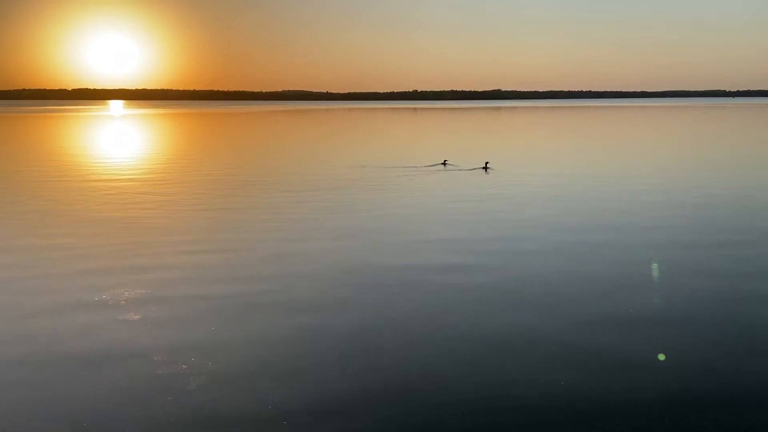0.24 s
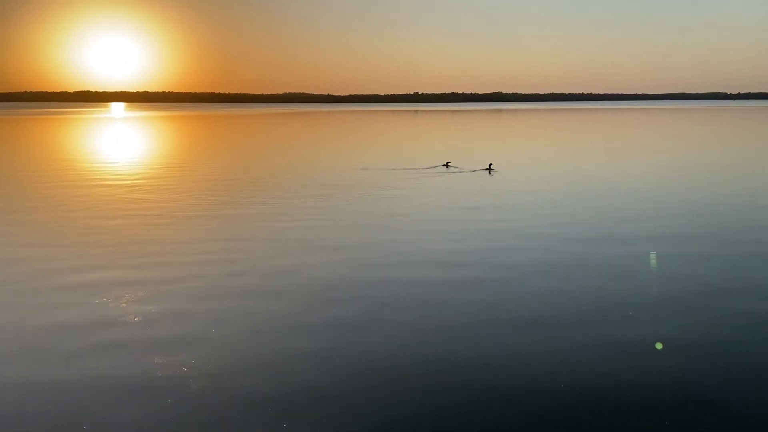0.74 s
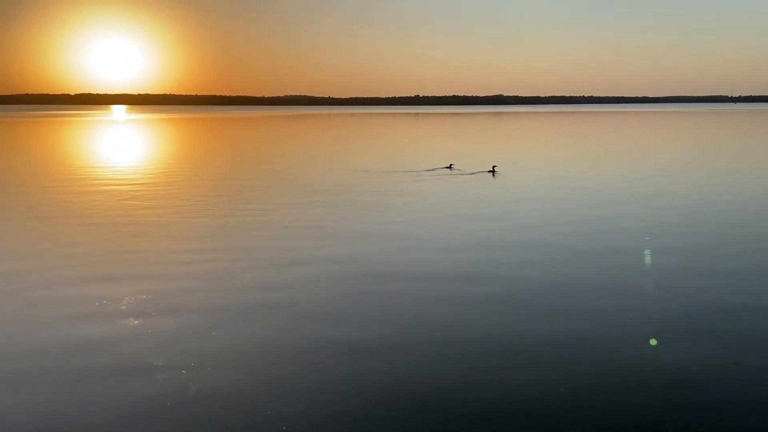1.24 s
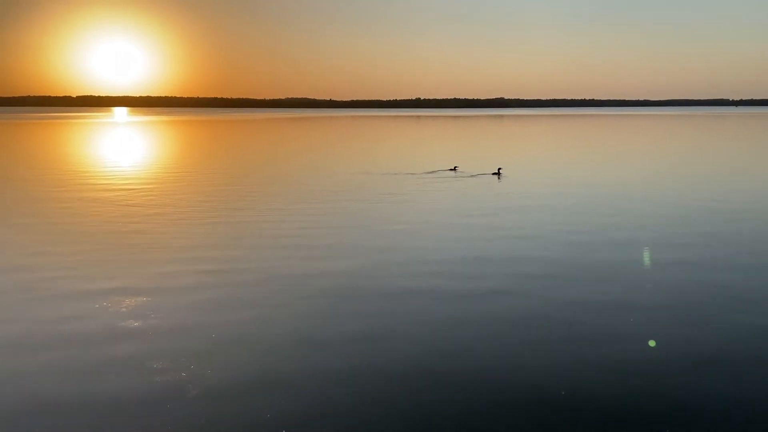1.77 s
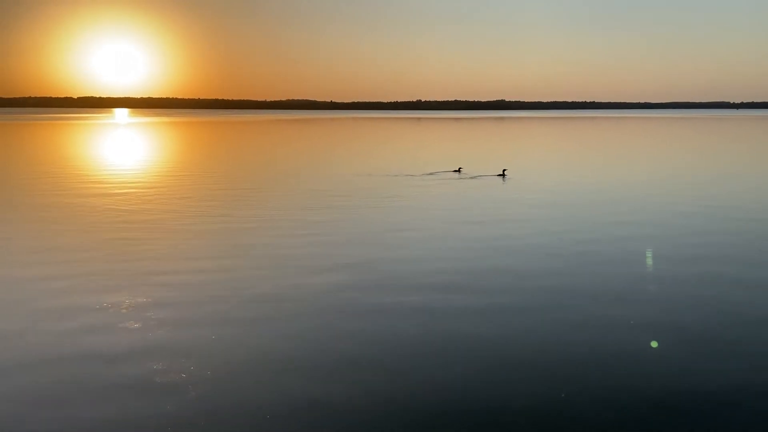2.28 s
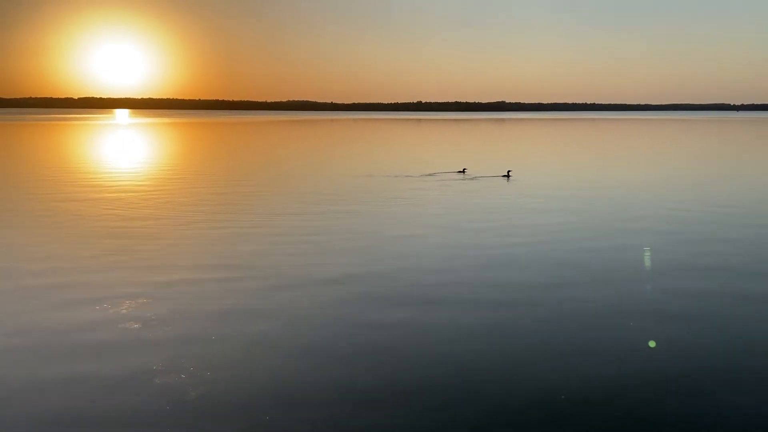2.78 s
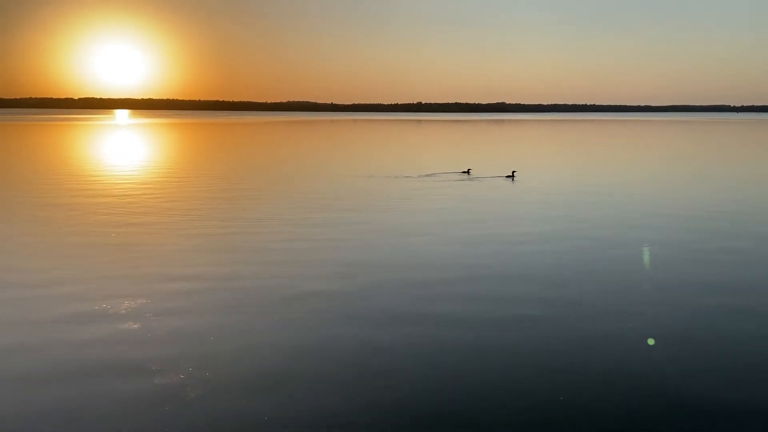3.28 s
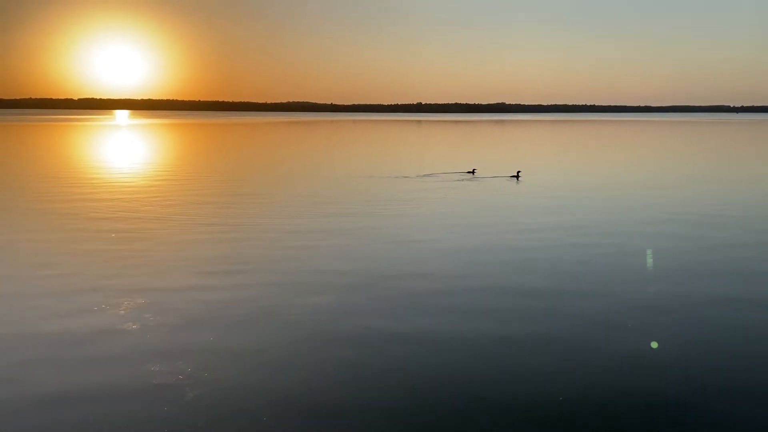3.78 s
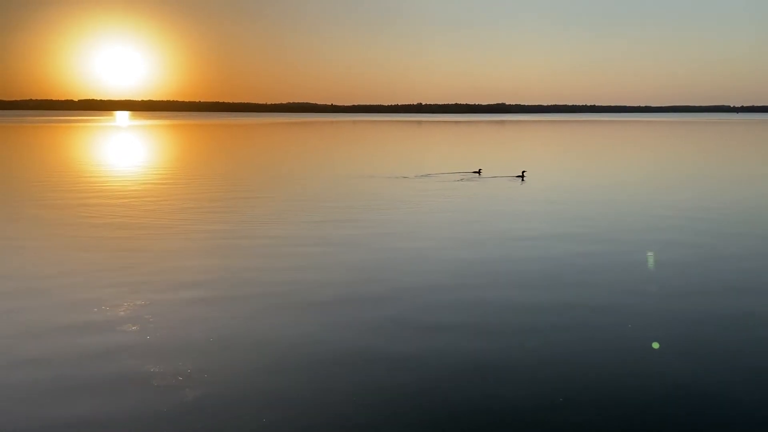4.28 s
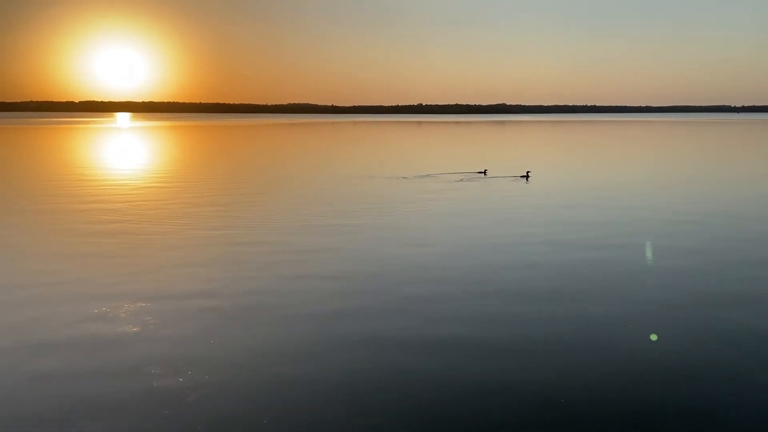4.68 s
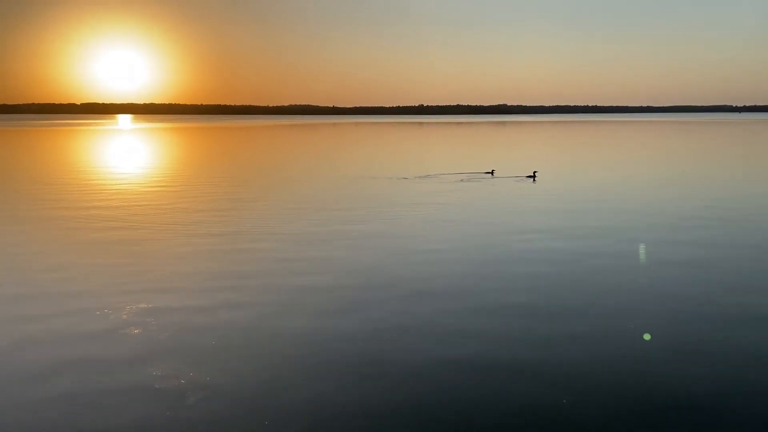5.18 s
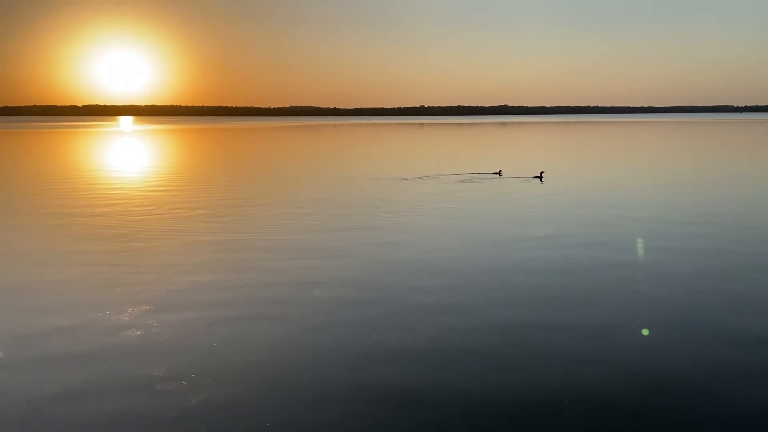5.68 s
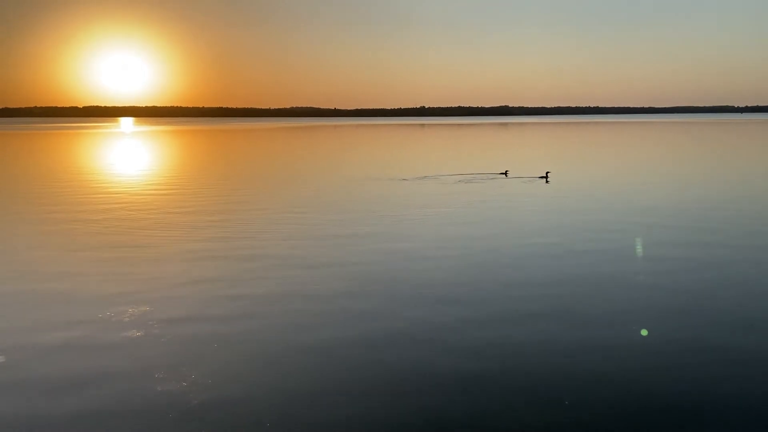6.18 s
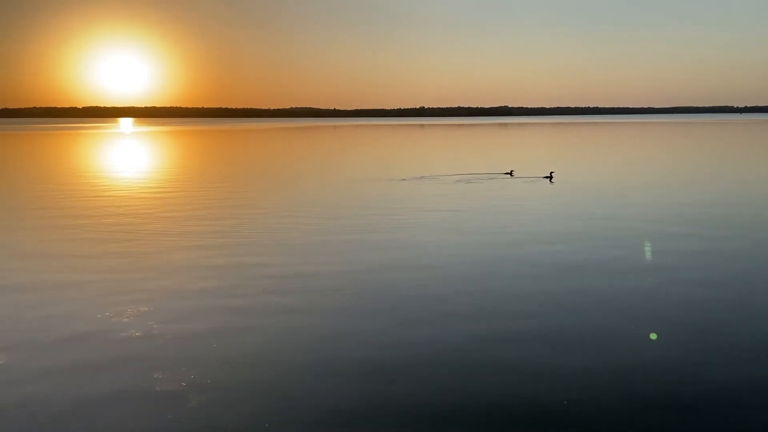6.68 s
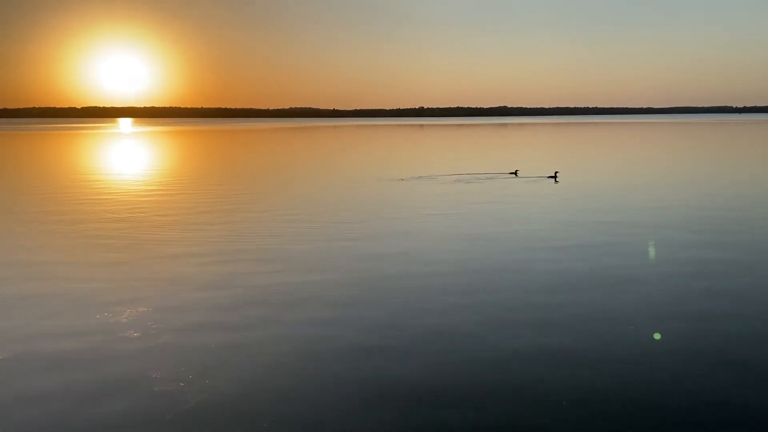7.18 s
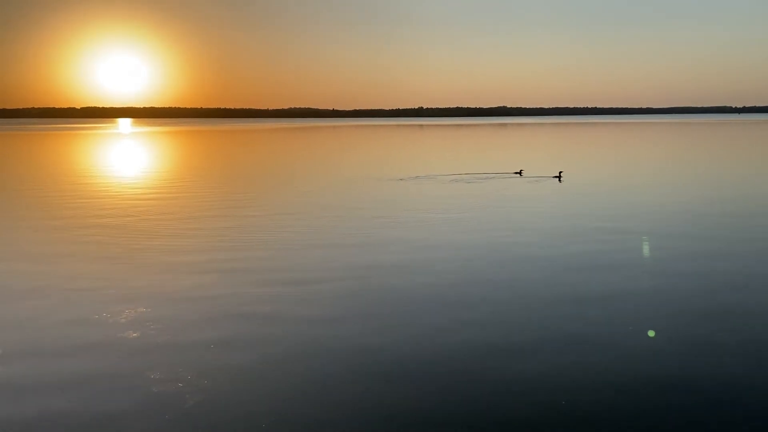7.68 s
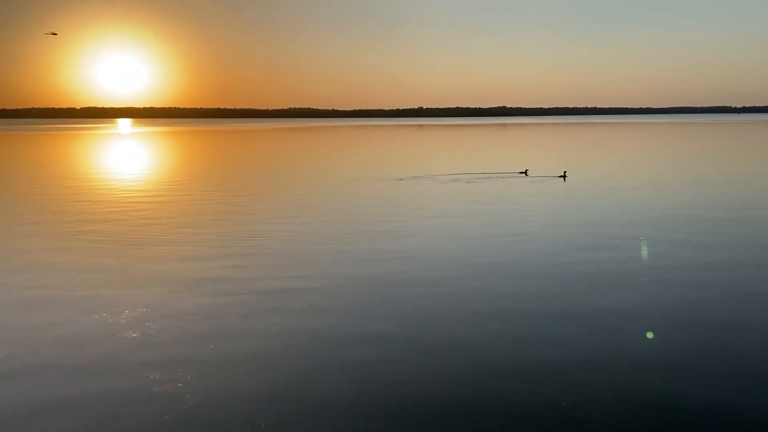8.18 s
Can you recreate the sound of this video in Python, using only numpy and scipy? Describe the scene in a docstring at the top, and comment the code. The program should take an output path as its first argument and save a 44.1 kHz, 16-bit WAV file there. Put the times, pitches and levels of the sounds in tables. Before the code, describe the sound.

On a quiet open lake, a loon utters five short tremolo calls, each a fast string of six or seven clear, arching hoots, spaced by about a second of stillness. Most calls break briefly into a higher register. Woods return a soft, long echo. Tiny bird twitters come early, a blurred far songbird later, and a soft hoarse hoot follows the fourth call. Low rumble and hum lie beneath; stereo microphones hear the loon slightly right.

```python
"""A loon gives five tremolo calls on a calm lake, to the right of a pair of microphones; the woods echo them.
Its two-register voice arches in pitch about eleven times a second; in four calls it breaks into the higher
register for a while and drops back. A rough catch precedes each call; a second loon's soft hoarse hoot follows
the fourth. Behind lie faint whistled twitters, a far songbird blurred by the woods, one tiny click, and shaped
noise: a low rumble, with a wavering hum, whose level dips before most calls and jumps as they begin, and a
faint hiss."""
import sys
import numpy as np
from scipy import signal
from scipy.fft import rfft, irfft, next_fast_len
from scipy.io import wavfile

SR = 44100
rng = np.random.default_rng(int(sys.argv[2]) if len(sys.argv) > 2 else 0)


def wav_out(sig):
    """Save sig, one row per channel (or a flat mono array), as 16-bit PCM at SR to the path in sys.argv[1]."""
    wavfile.write(sys.argv[1], SR, np.round(np.clip(np.atleast_2d(sig).T, -1, 1) * 32767).astype(np.int16))


N = 372204
EDGE_HZ = 14600  # upper edge of the recorded band


def gain_of(db):
    """Decibels to amplitude."""
    return 10 ** (np.asarray(db) / 20)


def evened(x):
    """Scales to rms 1."""
    return x / np.sqrt(np.mean(x ** 2) + 1e-20)


def read(points, hz):
    """Reads a table over log frequency."""
    table = np.array(points, float)
    return np.interp(np.log(hz + 1), np.log(table[:, 0] + 1), table[:, 1])


def add(mix, s, sound):
    """Mixes a sound in at time s."""
    part = mix[max(round(s * SR), 0):][:len(sound)]
    part += sound[:len(part)]


def shaped(x, response):
    """Filters by a response given as a function of Hz."""
    size = next_fast_len(x.shape[-1] + 512)
    spectrum = rfft(x, size) * response(np.fft.rfftfreq(size, 1 / SR))
    return irfft(spectrum, size)[..., :x.shape[-1]]


def wobble(n, hz):
    """Smooth chance of rms 1 that moves up to about hz times a second."""
    knots = np.convolve(rng.standard_normal(2048), np.hanning(7), "same")
    place = np.arange(n) * (4 * hz / SR) % 2040
    return evened(np.interp(place, np.arange(2048), knots))


def band_noise(n, centre_hz, octaves):
    """Noise in a bell-shaped band."""
    def bell(f):
        return np.exp(-(np.log2((f + 1) / centre_hz) / octaves) ** 2)
    return evened(shaped(rng.standard_normal(n), bell))


# spectrum of the still air over the lake: (frequency [Hz], relative density [dB per Hz])
AIR_SPECTRUM = [(20, -34.5), (40, -15), (62, -2.5), (90, -2), (120, -6), (160, -10.5), (250, -15),
                (420, -22.5), (630, -30), (1000, -40.5), (2000, -40), (4000, -41), (8000, -48),
                (13000, -65.5)]
# likeness of the air at the two microphones: (frequency [Hz], correlation [-1 to 1])
AIR_LIKENESS = [(60, 0.95), (100, 0.9), (180, 0.74), (300, 0.054), (520, 0.71), (900, 0.72), (1500, 0.43),
                (2600, -0.55)]
# level of the low rumble, dipping before most calls, used relative to its mean: (time [s], level [dB])
RUMBLE_LEVEL = [(0.05, -69), (0.19, -60.5), (1.34, -60.5), (1.83, -72.5), (1.94, -60), (2.48, -70),
                (2.64, -61), (3.46, -66.5), (3.58, -58.5), (4.42, -62.5), (4.6, -58.5), (5.73, -64),
                (5.8, -58.5), (6.34, -66), (6.9, -64.5), (7.08, -71), (7.15, -60), (8.44, -61.5)]
AIR_DB, HUM_DB, HUM_HZ = -63, -70, 106.3  # levels before the dips and jumps


def background(hum_waver=.015, hum_swell_db=3, hiss_share=0.16, lumps_db=0.5):
    """Low rumble and hum whose level dips before most calls and jumps as they begin, and a very faint hiss."""
    t = np.arange(N) / SR
    level_db = np.interp(t, *np.transpose(RUMBLE_LEVEL)) - np.mean(np.array(RUMBLE_LEVEL)[:, 1])

    def share(f, sign):
        return gain_of(read(AIR_SPECTRUM, f)) * np.sqrt(np.clip(1 + sign * read(AIR_LIKENESS, f), 0, 2))
    noise_a, noise_b = rng.standard_normal((2, N))
    mid = shaped(noise_a, lambda f: share(f, 1))
    side = shaped(noise_b, lambda f: share(f, -1))
    air = gain_of(AIR_DB) * evened(np.array([mid + side, mid - side]))
    low = shaped(air, lambda f: 1 / (1 + (f / 500) ** 2))
    hiss = air - low
    hum_hz = HUM_HZ * (1 + hum_waver * wobble(N, 7.3))
    hum = np.sin(2 * np.pi * np.cumsum(hum_hz) / SR) * gain_of(hum_swell_db * wobble(N, 1.9))
    rumble = (low + gain_of(HUM_DB) * evened(hum)) * gain_of(level_db + lumps_db * wobble(N, 7.8))
    both = rumble + hiss * gain_of(hiss_share * level_db)  # the hiss follows only slightly
    return both * gain_of([[-.5], [.5]])  # a little louder on the right


def chirp(length, hz, warble, db, blur, warble_hz=21):
    """A thin whistle that swings in pitch, with a finer random blur of the pitch."""
    t = np.arange(int(length * SR)) / SR
    swing = warble * np.sin(2 * np.pi * warble_hz * t + np.pi / 4)
    pitch = hz * (1 + swing + blur * wobble(len(t), 560))
    whistle = np.sin(2 * np.pi * np.cumsum(pitch) / SR)
    return gain_of(db) * evened(whistle * signal.windows.tukey(len(t), .6))


# a far songbird's opening notes, before the woods blur them: (time [s], pitch [Hz], level [dB])
SONG_OPENING = [(5.05, 3870, -87), (5.17, 5420, -82.5), (5.27, 5700, -84), (5.472, 5210, -76),
                (5.58, 5100, -73)]
# the two notes its song ends by rocking between: (first time [s], pitch [Hz], first level [dB])
SONG_SEESAW = [(5.869, 4140, -79.5), (5.932, 3040, -74.5)]
SEESAW_BEAT_S, SEESAW_FADE_DB_PER_S = .141, -5


def song_notes(count=5):
    """The songbird's opening notes, then its fading see-saw."""
    beats = SEESAW_BEAT_S * np.arange(count)
    seesaw = [(s + late, hz, db + SEESAW_FADE_DB_PER_S * late)
              for s, hz, db in SONG_SEESAW for late in beats]
    return list(SONG_OPENING) + seesaw


# twitters over the water: (time [s], length [s], pitch [Hz], warble [share of the pitch], level [dB])
TWITTERS = [(0.647, 0.066, 5260, 0.082, -80.5), (0.783, 0.086, 5030, 0.047, -81),
            (1.209, 0.085, 4760, 0.066, -77.5), (1.374, 0.078, 4940, 0.058, -81)]


def small_birds(note_length=0.062, woods_t60=0.99, twitter_blur=0.043):
    """Twitters over the water, and a song that the far woods blur into a wash of decaying noise."""
    twitter, song = np.zeros((2, N))
    for s, *note in TWITTERS:
        add(twitter, s, chirp(*note, blur=twitter_blur))
    for s, hz, db in song_notes():
        add(song, s, chirp(note_length, hz, .015, db, blur=.04))
    tail = rng.standard_normal((2, SR)) * gain_of(-60 * np.arange(SR) / SR / woods_t60)
    wash = signal.fftconvolve(song[None], tail / np.linalg.norm(tail[0]), axes=1)[:, :N]
    return twitter + 0.56 * song + wash


def click():
    """One tiny sharp click, an instant rise and fast decay, as the fourth call begins."""
    out, t = np.zeros(N), np.arange(200) / SR
    add(out, 5.3957, gain_of(-39) * np.exp(-t / .0004))
    return out


# echoes from stretches of shore: (delay [s], smear [s], level [dB re the loon])
SHORE_ECHOES = [(.075, .015, -25.5), (0.189, 0.012, -28), (.232, .01, -37), (0.492, .01, -44)]
# ring of the woods: (frequency [Hz], time to fall 60 dB [s])
WOODS_RING = [(600, 2.3), (1200, 1.34), (1800, 1.3), (4000, 0.42), (10000, .3)]


def shore(x, tail_db=-26, build=0.034, opposed=.3, dull_hz=6000):
    """Distinct echoes from the shore and the long, uneven ring of its woods, from shaped noise."""
    hz, t, z = signal.stft(rng.standard_normal((2, 2 * SR)), SR, nperseg=256)
    z = z * gain_of(-60 * t / read(WOODS_RING, hz)[:, None]) * (1 - np.exp(-t / build))
    tail = signal.istft(z, SR, nperseg=256)[1]
    # stands of trees send the sound back in clumps
    tail *= gain_of(4 * np.tanh(wobble(tail.shape[1], 18)))
    # sound from the sides reaches the two microphones out of step
    tail = tail - opposed / 2 * tail[::-1]
    # the ring's level is set between 700 and 1800 Hz
    voice_band = rfft(tail, SR * 2)[:, 1400:3600]
    tail *= gain_of(tail_db) / np.sqrt(np.mean(abs(voice_band) ** 2))
    for delay, smear, db in SHORE_ECHOES:
        for channel in tail:
            burst = rng.standard_normal(SR // 10) * np.exp(-np.arange(SR // 10) / SR / smear)
            add(channel, delay, gain_of(db) * burst / np.linalg.norm(burst))
    dulled = shaped(x, lambda f: 1 / (1 + (f / dull_hz) ** 4))
    return signal.fftconvolve(dulled[None], tail, axes=1)[:, :N]


# level of the loon between the microphones: (frequency [Hz], left minus right [dB])
MICROPHONE_LEVEL = [(650, -1), (880, -7), (1100, -2), (1300, -2.5), (1750, -2), (2600, 0), (3900, 1.5),
                    (7000, -0.5)]
# phase of the loon between the microphones: (frequency [Hz], lead of the left [rad])
MICROPHONE_LEAD = [(850, -.38), (1200, -.85), (1750, -.8), (2600, -.3), (3900, -1.05), (11000, -1.7)]


def microphones(x):
    """The pair of microphones hears the loon slightly to the right, by level and phase."""
    def half(f):
        return gain_of(read(MICROPHONE_LEVEL, f) / 2) * np.exp(.5j * read(MICROPHONE_LEAD, f))
    return np.array([shaped(x, half), shaped(x, lambda f: 1 / half(f))])


def hoot(hz=710, tone_db=-52, rasp_db=-50, rasp_peak=0.049):
    """A soft short hoot with a weaker second pulse, ending in a hoarse rasp of noise."""
    t = np.arange(SR // 3) / SR
    phase = 2 * np.pi * hz * np.cumsum(1 + .012 * wobble(len(t), 80)) / SR
    pulses = np.exp(-((t - .017) / .01) ** 2) + .5 * np.exp(-((t - .063) / .02) ** 2)
    tone = (np.sin(phase) + 0.1 * np.sin(2 * phase) + 0.22 * np.sin(3 * phase)) * pulses
    rasp_swell = (t / rasp_peak) ** 2 / (1 + (t / rasp_peak) ** 4) * (1 - t / t[-1])
    rasp = band_noise(len(t), 1250, .95) * rasp_swell
    return np.sqrt(2) * gain_of(tone_db) * tone + gain_of(rasp_db) * rasp


def creak(db, start_hz=380, end_hz=500, length=.029):
    """The rough rising catch, an octave down, with which a call starts: harmonics through a resonance."""
    u = np.linspace(0, 1, int(length * SR))
    hz = (start_hz + (end_hz - start_hz) * u) * (1 + .025 * wobble(len(u), 400))
    phase = 2 * np.pi * np.cumsum(hz) / SR
    stack = sum(np.cos(k * phase + rng.uniform(0, 2 * np.pi)) / (1 + ((k * hz - 1250) / 330) ** 2)
                for k in range(1, 7))
    return gain_of(db) * evened(stack * u * signal.windows.tukey(len(u), .4))


# crests climb to the top pitch by the third note, then sink ever faster (shares of the top pitch)
CLIMB, SINK = .095, .0048
# the pitch dips between notes, deeper as the call goes on (shares of the pitch)
DIP_FIRST, DIP_PER_NOTE, DIP_MOST = .145, 0.028, .21
# the last note falls to a resting pitch and trails off from there
FALL_S, REST_HZ, TRAIL_HZ_PER_S = 0.054, 649.8, 450
# the beat drags toward the end: each earlier beat has this share of the next one's drag
# the first troughs come early (share of a beat)
DRAG_SHARE, LEAN = .44, .06


def melody(t, first_crest, notes, beat, drag, top_hz, last_hz):
    """Round arches on a slowing beat: times of the troughs, distance from a crest, and pitch."""
    k = np.arange(notes)
    crest_s = first_crest + np.cumsum((k > 0) * (beat + drag * DRAG_SHARE ** k[::-1]))
    climb = CLIMB * np.maximum(1 - k / 2, 0) ** 1.5
    sink = SINK * np.maximum(k - 2, 0) ** 2
    crest_hz = top_hz * (1 - climb - sink)
    dip = np.minimum(DIP_FIRST + DIP_PER_NOTE * k[:-1], DIP_MOST)
    trough_hz = (1 - dip) * (crest_hz[:-1] + crest_hz[1:]) / 2
    trough_hz = np.r_[trough_hz[0], trough_hz, REST_HZ]
    crest_hz[-1] = last_hz
    trough_s = crest_s[:-1] + np.diff(crest_s) * (.5 - LEAN * np.maximum(1 - k[:-1] / 2, 0))
    turns_s = np.sort(np.r_[first_crest - beat / 2, crest_s, trough_s, crest_s[-1] + FALL_S])
    place = np.interp(t, turns_s, np.arange(len(turns_s)) / 2 - .5)  # whole numbers on the crests
    note = np.clip(np.round(place), 0, notes - 1).astype(int)
    away = 2 * abs(place - note)  # 0 on a crest, 1 in a trough
    sag = 1 - abs(np.cos(np.pi / 2 * away)) ** 1.4
    hz = crest_hz[note] + (trough_hz[np.floor(place).astype(int) + 1] - crest_hz[note]) * sag
    return trough_s, away, hz - TRAIL_HZ_PER_S * np.maximum(t - crest_s[-1] - FALL_S, 0)


# both registers are louder at higher pitch; the fundamental starts softly
FULL_HZ, LOW_DB_PER_OCTAVE, HIGH_DB_PER_OCTAVE = 892, 28, 10.5
SOFT_START_DB, SOFT_START_S, ATTACK_S, RELEASE_S = -3.5, .06, .0035, .03
# weakening between notes
LOW_DIP_DB, OCTAVE_DIP_DB, HIGH_DIP_DB = -0.5, -5.5, -6
# the low register's octave passes a resonance of the throat
OCTAVE_HZ, OCTAVE_WIDTH_HZ = 1702, 203
# the high register cracks in briefly just after each trough, ever weaker, and chokes the low one
CRACK_S, CRACK_LATE_S, CRACK_DB, CRACK_DB_PER_NOTE, CRACK_CHOKE = 0.0039, 0.0017, -3.5, -0.9, .7
# the leap between registers; the low one lingers after it and stirs faintly in the troughs
SWITCH_S, LINGER_S, STIR_DB = .0025, 0.017, -17.5


def quaver(call):
    """One call's pitch, and the strength of the low register, of its octave and of the high register."""
    start, first_crest, end, notes, beat, drag, top_hz, last_hz, held, low_db, high_db = call
    t = np.arange(start, end, 1 / SR)
    trough_s, away, hz = melody(t, first_crest, round(notes), beat, drag, top_hz, last_hz)
    since_leap = t - trough_s[2]  # the voice leaps after the third note
    leap = np.tanh(since_leap / SWITCH_S + 1)
    drop = np.tanh((since_leap - held) / SWITCH_S)
    aloft = (leap - drop) / 2 * (held > 0)
    crack = (1 - aloft) * sum(
        gain_of(CRACK_DB_PER_NOTE * k) * np.exp(-((t - s - CRACK_LATE_S) / CRACK_S) ** 2)
        for k, s in enumerate(trough_s))
    linger = np.exp(-np.maximum(since_leap, 0) / LINGER_S) + gain_of(STIR_DB) * away ** 4
    gate = np.minimum((t - start) / ATTACK_S, 1) * np.minimum((end - t) / RELEASE_S, 1)
    low_gate = abs(gate * gain_of(low_db) * (1 - aloft + aloft * linger) * (1 - CRACK_CHOKE * crack))
    octaves, between = np.log2(hz / FULL_HZ), away ** 3
    soft_db = SOFT_START_DB * np.exp((start - t) / SOFT_START_S)
    low = gain_of(LOW_DB_PER_OCTAVE * octaves + LOW_DIP_DB * between + soft_db)
    octave = gain_of(OCTAVE_DIP_DB * between) / (1 + ((2 * hz - OCTAVE_HZ) / OCTAVE_WIDTH_HZ) ** 2)
    high = gain_of(high_db + HIGH_DB_PER_OCTAVE * octaves + HIGH_DIP_DB * between)
    high = high * (aloft + gain_of(CRACK_DB) * crack)
    return t, away, hz, (low_gate * low, low_gate * octave, gate * high)


# overtones that leave the throat, before flutter and drift: (frequency [Hz], level [dB, relative])
THROAT_COLOUR = [(2000, -22), (2600, -34.5), (2800, -43.5), (3050, -55.5), (3500, -33.5), (3900, -38),
                 (4400, -41), (4900, -54), (5400, -52), (6200, -51.5), (7100, -47.5), (8800, -78.5),
                 (9800, -48), (11400, -46.5), (12800, -75.5), (14300, -66.5)]


def overtones(phase, hz, orders, flutter_db=4, drift_db=2):
    """Upper harmonics, coloured by the throat; each flutters and slowly drifts in level on its own."""
    n = len(hz)
    total = 0
    for k in orders:
        level_db = read(THROAT_COLOUR, k * hz) + flutter_db * wobble(n, 90) + drift_db * wobble(n, 2.7)
        harmonic = np.cos(k * phase + rng.uniform(0, 2 * np.pi))
        total = total + gain_of(level_db) * (k * hz < EDGE_HZ) * harmonic
    return total


def haze(n):
    """The fine rasp of air that rides on the loud notes."""
    return band_noise(n, 6200, .35)


JUMP = 1.45  # pitch of the high register as a ratio to the low
# the overtones swell in over the first note: how far down they start, and how fast they come
BLOOM_DB, BLOOM_S = -12.5, 0.017


def tremolo(call, overtones_db, shimmer_db=1.21, high_overtones_db=-7, sum_tone_db=-4, rasp_db=-50,
            push=4.6, full_hz=880, husk=0.0072, haze_db=-58):
    """Two registers of the syrinx follow one quavering pitch; the voice is unsteady between notes."""
    t, away, hz, (low, octave, high) = quaver(call)
    n = len(t)
    jitter, break_jitter = .003, .026  # shares of the pitch
    clash = 1.2  # radians

    def unsteady_phase(f):
        unsteady = f * (1 + (jitter + break_jitter * away ** 6) * wobble(n, 300))
        return 2 * np.pi * np.cumsum(unsteady) / SR
    low_phase, high_phase = unsteady_phase(hz), unsteady_phase(JUMP * hz)
    voice = low * np.cos(low_phase) - octave * np.cos(2 * low_phase) + high * np.cos(high_phase)
    # where both registers sound together they make a sum tone and roughen the overtones
    both = low * high / (low ** 2 + high ** 2 + 1e-12)
    sum_tone = both * high * (1 - away ** 2) * np.cos(low_phase + high_phase)
    voice += gain_of(sum_tone_db) * sum_tone
    unrest = wobble(n, 700)
    # overtones are strongest on the highest crests
    bright = gain_of(overtones_db) * (1 - .6 * away ** 2) * (hz / full_hz) ** push
    bright *= gain_of(BLOOM_DB * np.exp(-((t - t[0]) / BLOOM_S) ** 2))
    low_overtones = overtones(low_phase + husk * unrest, hz, np.arange(3, 18))
    voice += bright * np.sqrt(low * octave) * low_overtones
    rough_phase = high_phase + (husk + clash * both) * unrest
    high_overtones = overtones(rough_phase, JUMP * hz, np.arange(2, 13))
    voice += gain_of(high_overtones_db) * bright * high * high_overtones
    voice += gain_of(rasp_db) * (low + high) * band_noise(n, 1700, 0.38)
    voice += gain_of(haze_db) * bright * (low + octave + both * high) * haze(n)
    return t[0], np.sqrt(2) * voice * gain_of(shimmer_db * wobble(n, 89))


# the loon's calls: (start [s], first crest [s], end [s], notes [count], beat [s], drag of the last beat [s],
# top pitch [Hz], last pitch [Hz], time held in the high register [s], low register [dB],
# high register [dB], overtones [dB, relative]); register levels are before the shaping of each note
CALLS = [(.165, .177, .805, 7, .0858, .026, 905, 730, 0, -32.3, -23, 0),
         (1.834, 1.851, 2.425, 6, .0835, .014, 920, 838, .19, -31.8, -21.8, -1.5),
         (3.506, 3.523, 4.155, 7, .0862, .017, 913, 806, .288, -29.8, -21, 3),
         (5.396, 5.397, 6.06, 7, .0853, .016, 906, 832, .305, -30.7, -21.5, 0),
         (7.099, 7.122, 7.73, 7, .0841, .021, 914, 747, .272, -31.5, -23, 0)]
# the rough catch before each call: (time [s], level [dB])
CATCHES = [(0.139, -50.5), (1.803, -49.5), (3.485, -51), (5.381, -44), (7.074, -50.5)]


def loon():
    """The five calls with their catches, and a second loon's soft hoot, all dry."""
    out = np.zeros(N)
    for *call, overtones_db in CALLS:
        add(out, *tremolo(call, overtones_db))
    for s, db in CATCHES:
        add(out, s, creak(db))
    add(out, 6.317, hoot())
    return out


def scene():
    """The loon with its echoes, small birds, a click and the still air."""
    calls = loon()
    return microphones(calls) + shore(calls) + small_birds() + click() + background()


def record(dry):
    """The recorder opens a moment in and limits the band."""
    opened = np.clip((np.arange(N) / SR - .044) / .004, 0, 1)
    band_limit = signal.firwin(511, EDGE_HZ, window=("kaiser", 9), fs=SR)
    return signal.oaconvolve(dry * opened, band_limit[None], "same")


dry = scene()
out = record(dry)
wav_out(out)
```